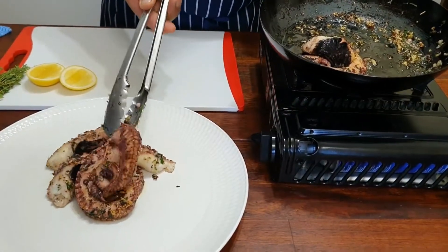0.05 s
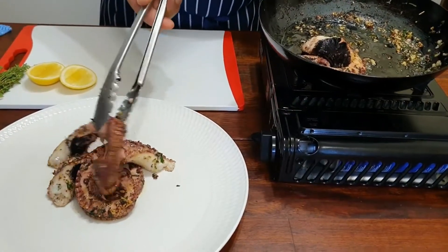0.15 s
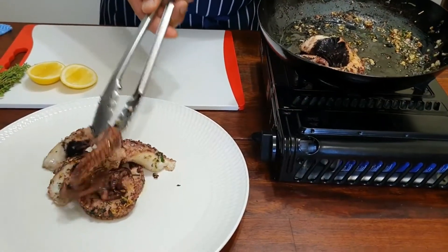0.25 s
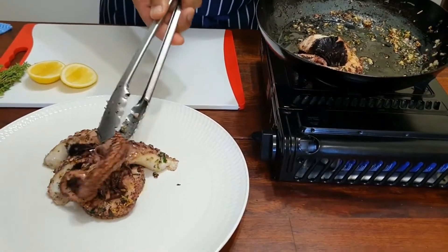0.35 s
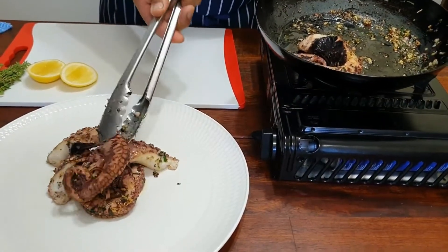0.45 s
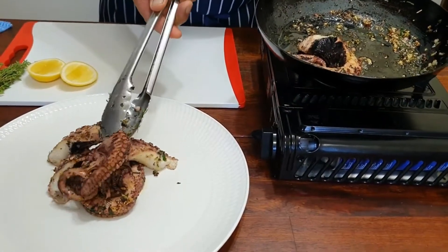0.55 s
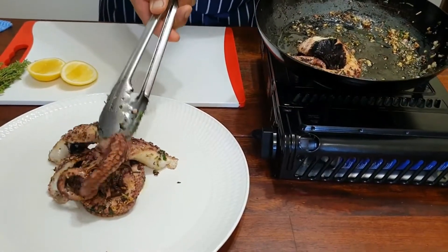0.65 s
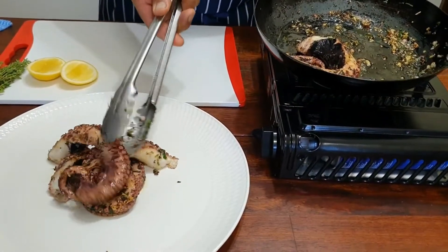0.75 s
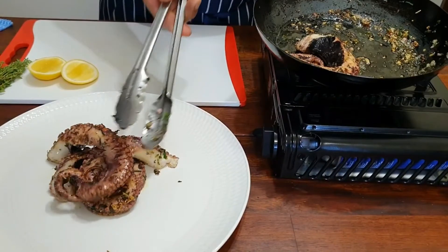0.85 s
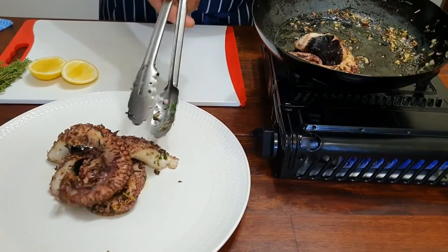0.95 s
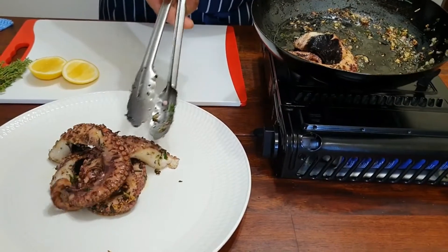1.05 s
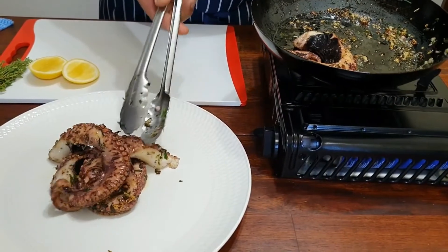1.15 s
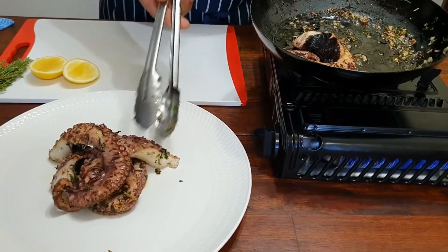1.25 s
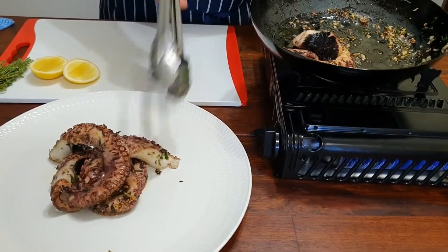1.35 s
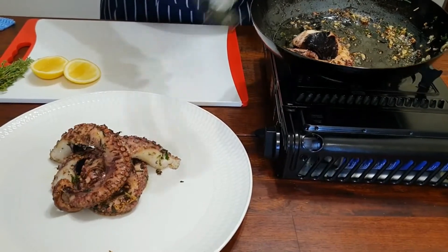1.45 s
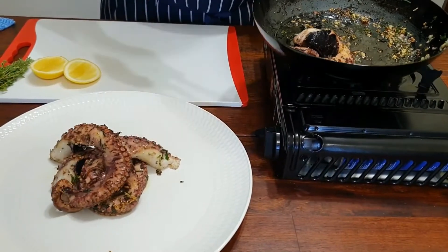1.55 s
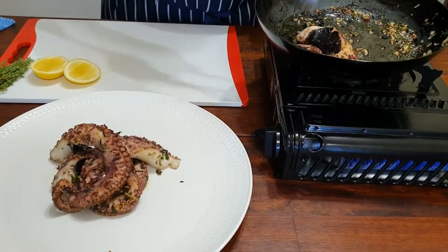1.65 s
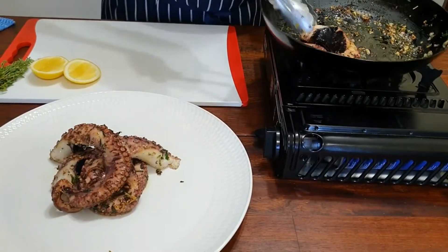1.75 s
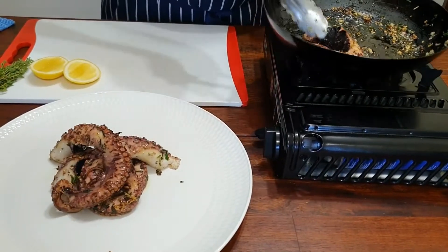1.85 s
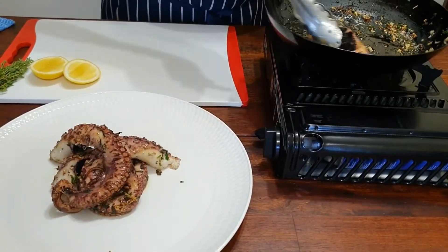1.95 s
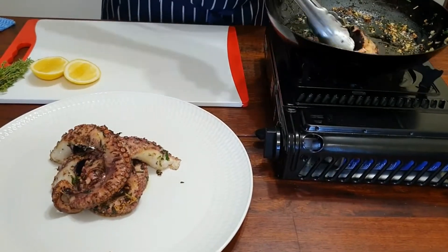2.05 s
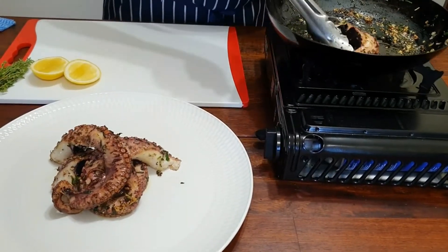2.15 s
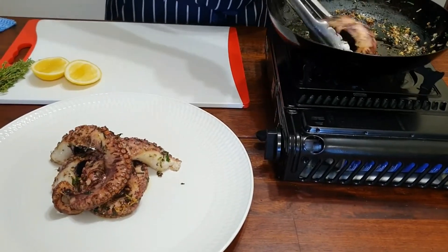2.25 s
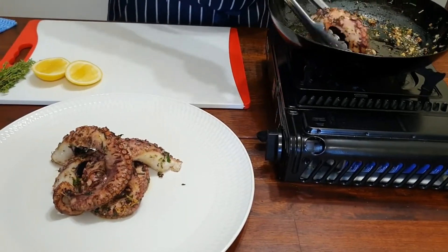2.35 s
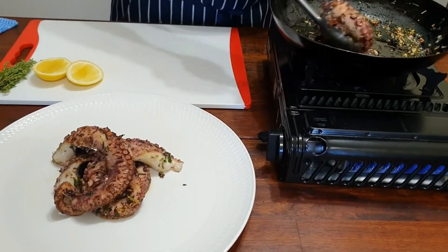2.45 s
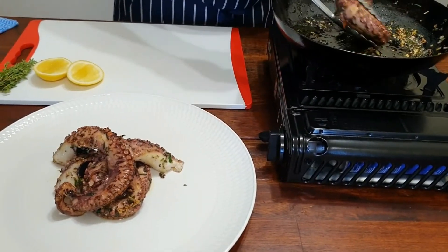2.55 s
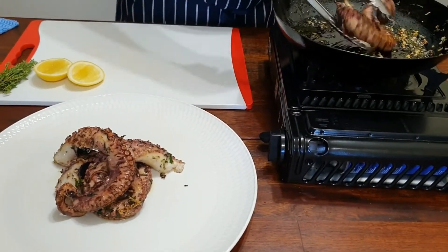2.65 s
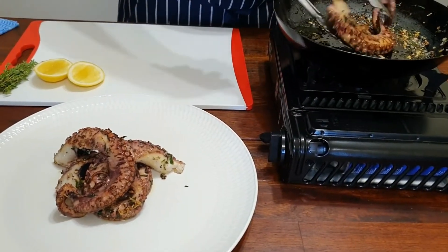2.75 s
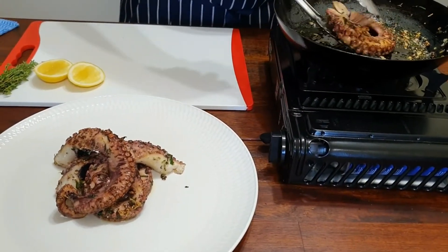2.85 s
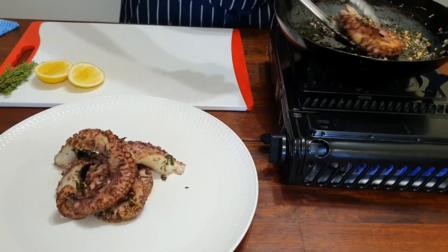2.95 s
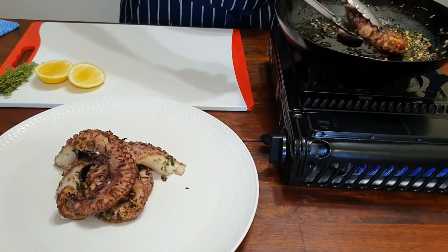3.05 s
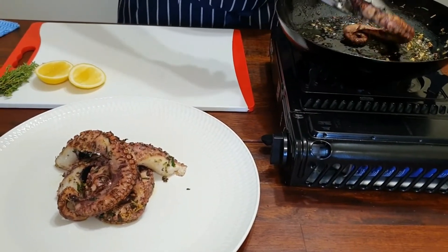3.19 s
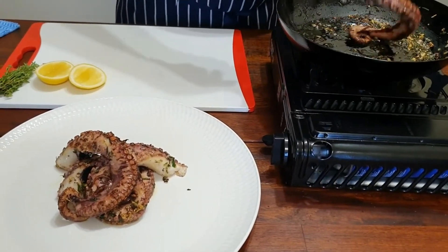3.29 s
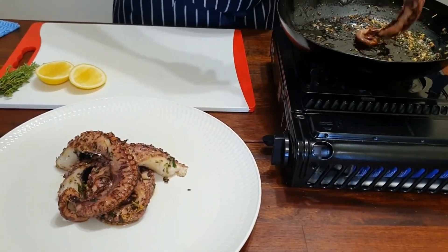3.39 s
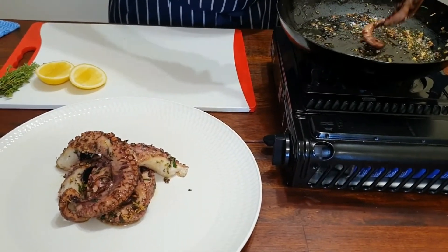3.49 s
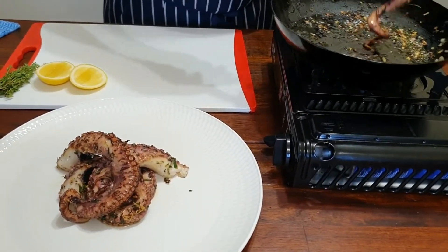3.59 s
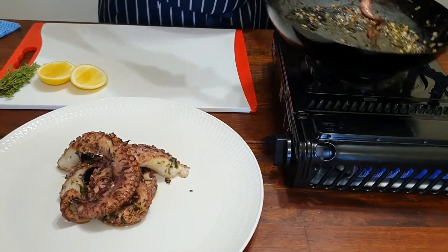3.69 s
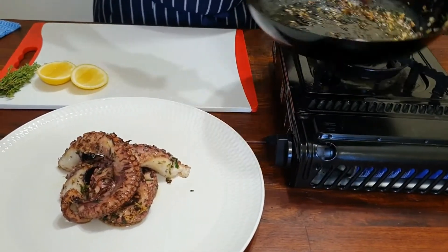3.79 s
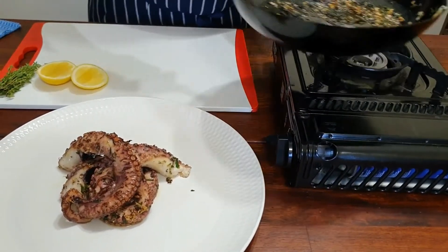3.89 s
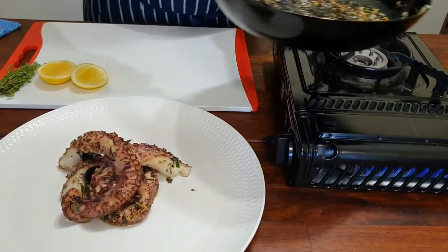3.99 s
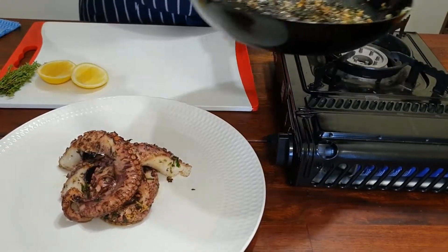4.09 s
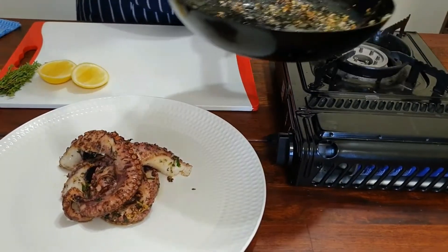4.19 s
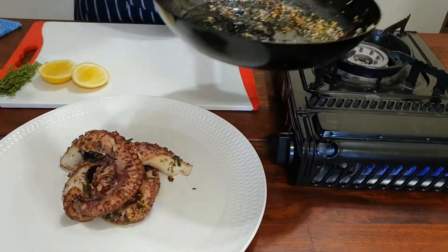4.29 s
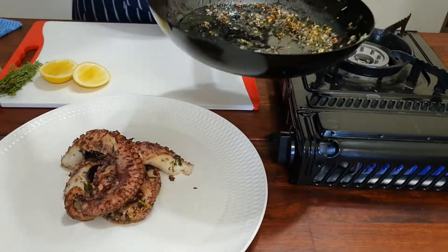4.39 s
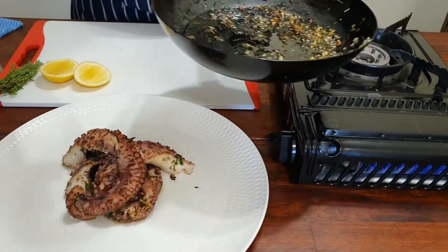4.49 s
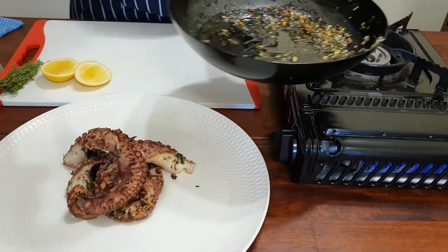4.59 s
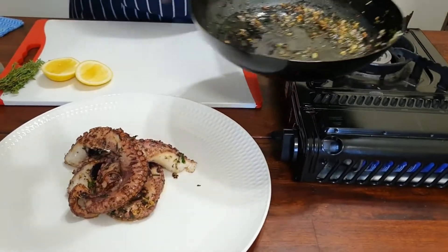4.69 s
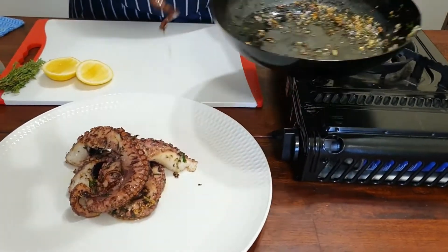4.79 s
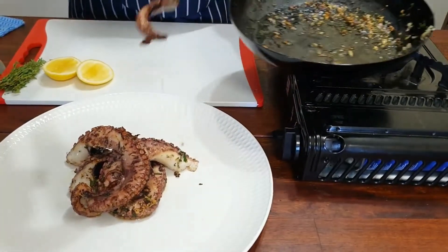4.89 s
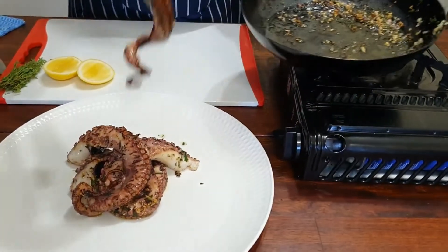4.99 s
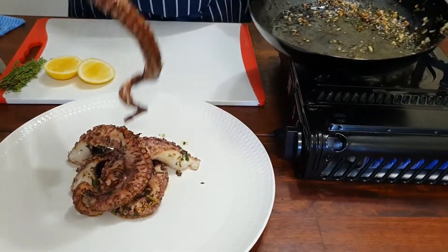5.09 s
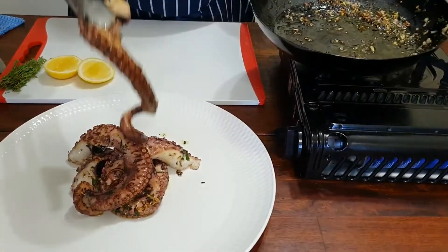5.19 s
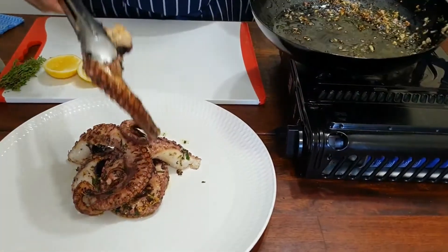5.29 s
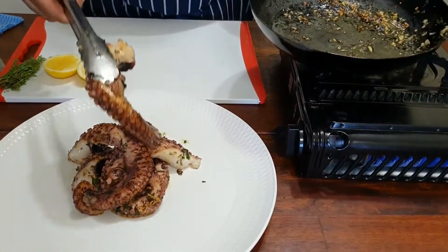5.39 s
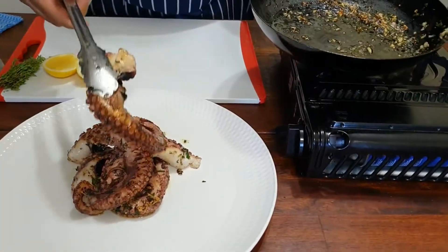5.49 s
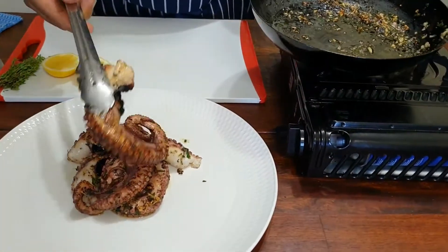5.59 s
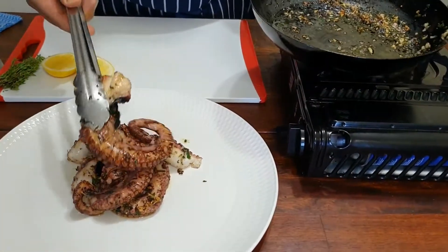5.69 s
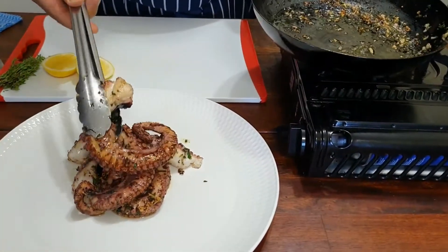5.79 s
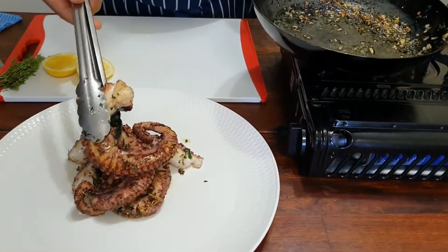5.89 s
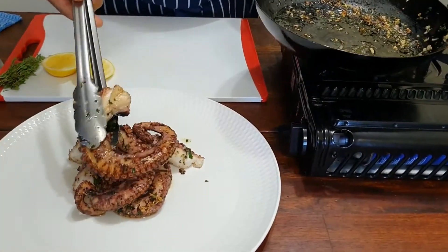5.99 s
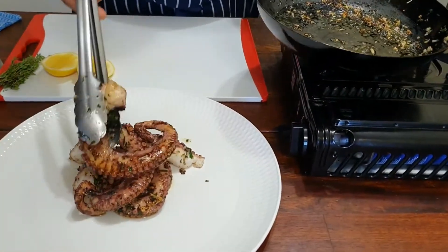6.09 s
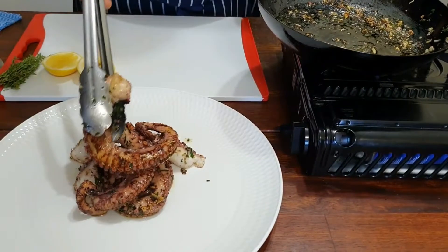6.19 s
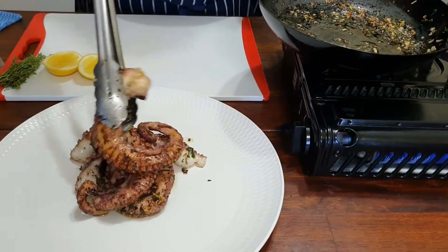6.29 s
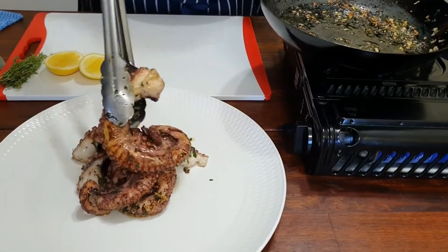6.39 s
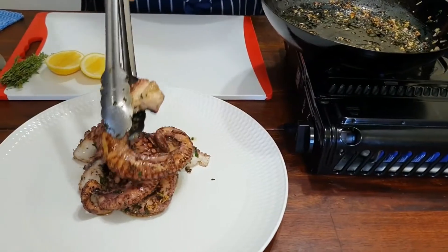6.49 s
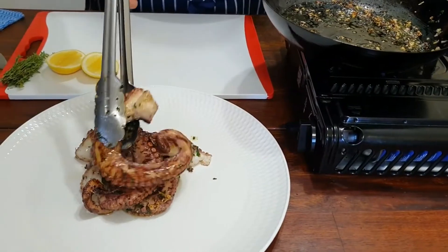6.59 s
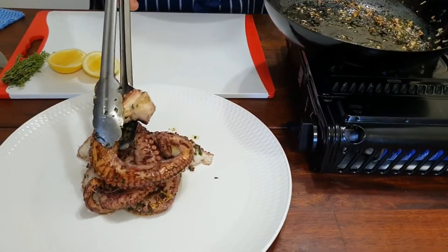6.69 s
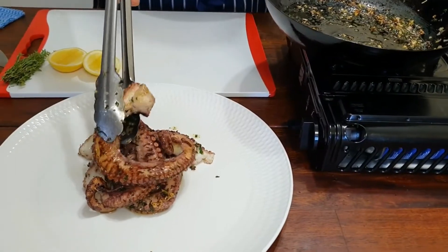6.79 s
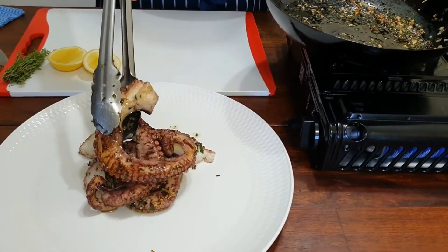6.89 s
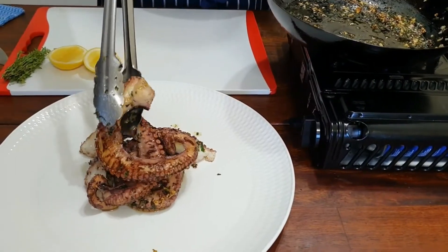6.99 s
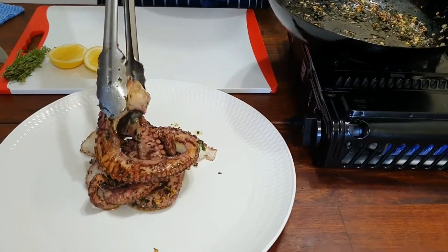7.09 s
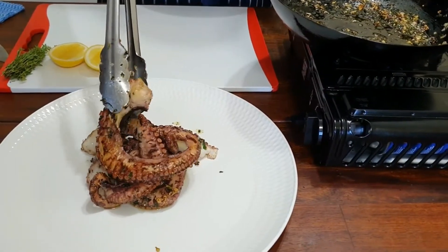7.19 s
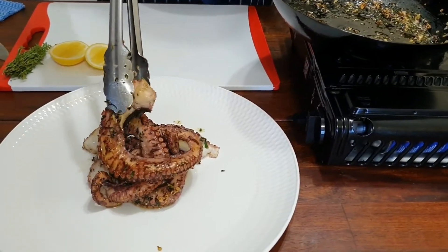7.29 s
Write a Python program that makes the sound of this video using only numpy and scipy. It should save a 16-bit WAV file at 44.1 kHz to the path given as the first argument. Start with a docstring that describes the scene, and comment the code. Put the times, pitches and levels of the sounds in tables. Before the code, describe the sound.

In a quiet kitchen, metal tongs bump a plate, clatter and scrape in a pan, and the pan later knocks onto its stove grate.

```python
"""Tongs at a frying pan

Steel tongs fetch grilled food from a pan and lay it on a plate in a small kitchen: dull plate bump, then
clacks and slides in the pan; the pan is lifted off a portable stove, set back and nudged on its grate.
Blows are noise through struck-spot resonances plus decaying modes and a low hum; strokes are random slips
under swelling pressure; wet squelches are clumps of tiny pops. Behind: air noise, wavering drone, rumble."""
import sys
import numpy as np
from scipy import signal
from scipy.fft import rfft, irfft
from scipy.io import wavfile
from scipy.ndimage import uniform_filter1d

SR = 44100
rng = np.random.default_rng(int(sys.argv[2]) if len(sys.argv) > 2 else 0)


def transcribe(signal):
    """Save signal, clipped to [-1, 1], as a 16-bit WAV file at the path in sys.argv[1]."""
    frames = np.atleast_2d(signal).T
    limited = np.clip(frames, -1, 1)
    pcm = np.round(limited * 32767).astype(np.int16)
    wavfile.write(sys.argv[1], SR, pcm)


N = 324039
TIME = np.arange(N) / SR

# Source levels are nominal, before room echoes and stereo balance.
# Room air spectrum, relative: f/Hz, density/dB per Hz
AIR = [(12, -73), (20, -8), (43, -17), (91, -1), (176, -17.5), (282, -13.5), (361, -18.5), (392, -15),
       (593, -21.5), (760, -16.5), (825, -19), (1360, -20), (9330, -40.5), (11600, -42), (14500, -47)]
AIR_DB = -60.5
# Appliance drone: f/Hz, level/dB
HUM = [(100.6, -67), (68, -74)]
# Low rumble swells: t of peak/s, half length/s, level/dB
RUMBLES = [(4.1, 0.46, -58), (6.697, 0.99, -62.5)]
RUMBLE_HZ = 77.5

# Small wet squelches and squeaks, and a tiny high click of the tongs' spring. Columns:
# t/s, length/s, level/dB, centre f/Hz, width/Hz
SQUELCHES = [(0.2377, 0.003, -59, 12100, 3000), (0.238, .005, -73, 6500, 4000),
             (0.247, 0.34, -89, 6050, 3000), (3.0545, 0.004, -46.5, 6730, 4430),
             (4.796, 0.21, -82, 12000, 4030), (6.061, 0.25, -82, 3890, 220), (6.561, 0.32, -77, 3310, 200),
             (6.598, .22, -84, 2860, 200), (6.54, 0.51, -81.5, 5840, 4000)]

# Blows. Soft tilts the sound down, long contact shuts out treble, heavy adds a thud. Columns:
# t/s, body/dB, hollow re body/dB, thud re body/dB, tilt/dB per octave, contact/s, struck spot (name),
# low hum/dB (the bowl's in pan blows, a short dull hum in the plate bump), hum t60/s,
# rattle t60/s, room echo offset/dB
PLATE_BLOWS = [(0.819, -54, -6, -4, -13.5, 0.00027, "plate", -43, 0.085, 0.035, 0)]
TONG_BLOWS = [(1.647, -35.5, -9, -13.5, -6.5, 0.00017, "wall", -48.5, 0.5, 0.046, 1),
              (1.9165, -36, -13, -9, .5, 0.000095, "tips", -30, 0.36, 0.12, 1.5),
              (1.9526, -25, -16.5, -15.5, -4, 0.00022, "base", -29, 0.24, 0.028, -4),
              (1.9556, -25.5, -10, -17, -4.5, 0.00024, "base", -43, 0.27, .015, -5.5),
              (1.9755, -35, -15, -12.5, -2.5, 0.00027, "base", -60, .2, .02, 1.5),
              (2.0175, -36.5, -8, -16, -5.5, 0.00022, "base", -62, .2, 0.013, -6),
              (2.055, -43, -8, -16, -4.5, 0.00033, "base", -60, .2, .012, -7),
              (2.178, -50.5, -12, -19, -1, 0.00029, "base", -57, 0.18, 0.017, -4),
              (2.313, -44.5, -19, -17, -2.5, 0.00011, "grip", -49, 0.53, .05, 1),
              (2.405, -75, -9, -9, 6, 0.00013, "grip", -49, 0.34, .035, 1),
              (2.7715, -48, -4, -9, -1.6, 0.00016, "side", -46.5, 0.37, 0.055, -1),
              (3.032, -54, -12, -29, -10, .00024, "food", -53.5, 0.27, 0.043, -6),
              (3.0555, -50, -6, -14, -8, .00006, "food", -47.5, 0.27, 0.18, -2)]
GRATE_BLOWS = [(3.627, -45, -8, -8, -9.5, 0.00013, "prong", -42.5, 0.56, 0.082, -2),
               (3.7585, -46.5, -10.5, -13.5, -2.5, 0.00047, "prong", -60, 0.49, 0.023, -7),
               (5.0993, -30.5, -8, -14.5, -3, 0.00016, "case", -31, 0.7, 0.044, -2.5),
               (5.224, -36.5, -6, -13, -5.5, .00012, "case", -34.5, 0.61, 0.097, 0),
               (5.225, -61, -16.5, -22, -3, 0.000055, "case", -60, 0.27, 0.014, -4),
               (6.2522, -45, -3, -1.5, -4.5, 0.00021, "corner", -33.5, .36, 0.042, -2),
               (6.3273, -52.5, -10, 1.5, -7.5, 0.00019, "corner", -59, 0.27, .04, -4),
               (6.372, -62.5, 1, 7, -9, 0.00036, "corner", -58, .3, 0.022, -4)]
# Blow registers thud, hollow, body, clank, edge, tick: low f/Hz, high f/Hz
BANDS = [(50, 360), (410, 700), (700, 1400), (1400, 3500), (3500, 8500), (8500, 16000)]
CLANK_DB = 6  # added to the clank register of every blow
# Struck spots on pan, stove or plate. name: (crowd of weak modes/dB, [f/Hz, half width/Hz, level/dB])
SPOTS = {"wall": (-10, [(545, 8.8, -10), (863, 127, 1.5), (1210, 81, 1.5), (1594, 58, -10), (1860, 20, -11),
         (2540, 54, -15.5), (2970, 74, -14)]), "tips": (-2.5, [(1464, 26, 1), (1800, 31, -4),
         (2120, 29, -16), (2450, 41, -14.5), (2960, 33, -9), (3334, 31, -12.5), (5530, 28, -13.5),
         (5800, 28, -15), (7060, 56, -15.5), (7520, 59, -12.5)]), "base": (-5.5, [(1015, 67, -2.5),
         (1275, 42, -10.5), (1590, 18.5, -21), (1680, 75, -7), (2090, 20, -18), (2300, 59, -10),
         (2530, 88, -8), (2820, 31, -10.5), (3270, 37, -8), (3640, 25, 1)]), "grip": (-12, [(1170, 100, -5),
         (1510, 50, -14), (2010, 140, -7), (2580, 89, -4), (2830, 29, -9), (3760, 47, -34)]),
         "side": (-9.5, [(528, 16, -7), (680, 36, -2), (1123, 28, -5.5), (1712, 63, 2), (1990, 39, -9),
         (2220, 25, -2), (2550, 36, -8), (3230, 120, -8.5), (4630, 32, -33), (5360, 34, -23)]),
         "food": (-8, [(650, 54, -3), (1180, 55, -2), (1800, 38, -1), (2700, 49, -21)]),
         "prong": (-10, [(670, 7.8, -13.5), (978, 32, -7.5), (1730, 120, 1.5), (2050, 79, -9),
         (2820, 29, -17), (3330, 26, -11.5)]), "case": (-9.5, [(535, 34, -14), (778, 36, 0),
         (856, 45, -0.5), (918, 32, 0.5), (1213, 60, -0.5), (1317, 56, -2), (1690, 92, -3.5),
         (1848, 74, -0.5), (2240, 120, -9.5), (2487, 110, -4), (2830, 61, -8.5), (3040, 110, -8.5),
         (3700, 180, -13.5), (4510, 60, -16.5), (5500, 150, -22.5)]), "corner": (-8.5, [(790, 11, 1.5),
         (955, 53, 2), (1420, 21, -8), (1700, 34, -6), (2060, 49, -11), (2280, 77, -13), (2500, 47, -13),
         (3660, 46, -15), (3830, 36, -10)]), "plate": (-5.5, [(662, 140, -0.5), (910, 49, 3),
         (1170, 110, -11)])}
# Spectrum of the crowd of weak modes, relative: f/Hz, level/dB
CLATTER = [(60, -14.5), (110, -15.5), (200, -20.5), (330, -16), (520, -7), (640, -16), (800, -4.5),
           (1000, -5), (1350, -1.5), (1750, -2.5), (2150, -5.5), (2520, -8.5), (4300, -17), (5600, -19.5),
           (8000, -20.5), (14000, -25.5)]
# Plate modes: f/Hz, level/dB, t60/s
PLATE = [(283, 9, .12), (680, 4, 0.1), (790, 5.5, 0.15), (937, 4.1, 0.17), (1256, 1, .1)]
# Pan modes other than the bowl hum: f/Hz, level/dB, t60/s
PAN = [(272, 5, .45), (302, 6, .45), (536, 1, .65), (776, 1, .42), (820, -1, .45), (935, 2, .4),
       (1011, 4, .5), (1137, -2, .4), (1178, -3, .45), (1223, 0, .5), (1268, -1, .45), (1314, 3, .55),
       (1402, -1, .55), (1478, -2, .45), (1530, 0, .45), (1612, -2, .45), (1695, -3, .5), (1772, 0, .45),
       (1822, -2, .45), (1890, 1, .4), (2080, 1, .45), (2286, 1, .45), (2456, 0, .45), (2492, 3, .5),
       (2574, 0, .45), (2831, 2, .45), (2907, -1, .4), (3083, 0, .4), (3425, 0, .4)]
# Low hum, with a gradual onset in blows: the pan bowl's, also used for the plate bump's dull hum
LOW_HUM_HZ, LOW_HUM_RISE_S = 387.9, 0.013
# Tong modes: f/Hz, level/dB, t60/s
TONGS = [(1478, 3, .13), (1826, 1, .14), (2100, -2, .12), (2449, -1, .13), (2570, -4, .14), (3321, -4, .18),
         (3801, -7, .12), (4316, -15, .4), (5536, 5, .16), (6196, -9, .12), (7187, -11, .15),
         (7413, -12, .22), (7843, -11, .12), (9496, -17, .2), (11910, -18, .12), (12850, -19, .12)]
# Singing tong arms: t/s, level/dB, tilt about ARM_HZ/dB per octave
ARM_RINGS = [(1.9175, -35, -1.5), (2.3135, -52, 0), (2.772, -66, -3), (3.0555, -70, 6)]
ARM_HZ = 5536

# Strokes in the pan: steel tongs sliding, food pushed faintly through the oil (t = 3.36 s), and a late
# swell of bowl hum after the blow at 2.313 s (t = 2.37 s); then the pan dragged on the grate. Columns:
# t of peak/s, half length/s, level/dB, squeal f/Hz, squeal re rasp/dB, grit re rasp/dB, bowl hum/dB
PAN_STROKES = [(1.87, 0.098, -59.5, 1026, -3, -24, -63), (2.035, 0.021, -44.5, 1330, 1, -13, -60),
               (2.09, 0.028, -44.5, 1060, 1.5, -22, -37.5), (2.16, .034, -50, 1082, 1.5, -12.5, -42),
               (2.235, 0.042, -59, 1123, 3, -14, -61), (2.29, 0.039, -58.5, 1160, 10, -14, -78),
               (2.33, 0.016, -52.5, 1206, 3, -5, -55), (2.37, 0.053, -78.5, 1160, 2, 8.5, -47.5),
               (2.735, 0.029, -65.5, 575, -2, -22, -55.5), (2.93, 0.076, -71.5, 680, -1, -29, -64.5),
               (3.027, .008, -63, 696, 0, -28, -70), (3.09, 0.049, -62, 1229, 2, -15, -57),
               (3.36, 0.28, -70, 1294, -8, -24, -80)]
PAN_DRAGS = [(3.725, 0.026, -58, 1100, 6.5, -43, -62), (3.75, .016, -50.5, 1783, -4.5, -48.5, -68),
             (6.52, 0.048, -64, 860, -0.5, -39.5, -53.5), (6.64, 0.037, -62, 776, -4, -35, -49),
             (6.745, 0.06, -64, 1780, -10, -37, -55.5), (6.91, 0.031, -68.5, 810, -1, -39, -51),
             (7.13, 0.097, -74, 815, 1, -40, -66)]
# Rasp spectrum, relative: f/Hz, level/dB
RUB = [(100, -40), (300, -2.5), (550, 9), (1100, 5), (1800, 4.5), (2800, -6), (4200, -9.5), (8000, -14.5),
       (15000, -102)]
SQUEAL_GLIDE_PER_HALF_LENGTH = 0.04  # fraction of squeal frequency
OVERTONE_RATIO, OVERTONE_DB = 2.2, -16

# Kitchen decay: f/Hz, t60/s
KITCHEN = [(100, 0.57), (400, 0.61), (1000, 0.39), (2500, 0.39), (6000, 0.61), (13000, 0.18)]
# Left/right likeness of diffuse sound: f/Hz, likeness (0 to 1)
LIKENESS = [(60, 0.93), (300, 0.88), (600, 0.46), (1100, 0.0011), (3000, 0), (15000, 0.088)]
EDGE_HZ = 14700


def amp(db):
    """Decibels to gain."""
    return 10 ** (np.asarray(db) / 20)


def evened(x):
    """Scales to rms 1."""
    return x / np.sqrt(np.mean(x ** 2) + 1e-20)


def read(points, hz):
    """Interpolates a table on a log-frequency axis."""
    f_hz, value = np.transpose(points)
    return np.interp(np.log(hz + 1), np.log(np.maximum(f_hz, 1)), value)


def bump(hz, centre_hz, width_hz):
    """Squared resonance magnitude; gain 1/2 at half the width either side of centre."""
    return 1 / (1 + (2 * (hz - centre_hz) / width_hz) ** 2)


def swell(age_s, half_s):
    """Gaussian rise and fall around age 0; 1/e at half_s."""
    return np.exp(-(age_s / half_s) ** 2)


def noise(gain, size):
    """Noise of rms 1 with the spectrum gain(hz)."""
    spectrum = rfft(rng.standard_normal(size)) * gain(np.fft.rfftfreq(size, 1 / SR))
    return evened(irfft(spectrum, size))


def impulses(size, per_s, floor):
    """Sparse random impulses over a weaker noise floor."""
    return rng.standard_normal(size) * (floor + (rng.random(size) < per_s / SR))


def pair(x):
    """Two unrelated signals become a diffuse field at two close points: alike in the bass."""
    size = x.shape[1]
    a, b = rfft(x)
    same = np.clip(read(LIKENESS, np.fft.rfftfreq(size, 1 / SR)), -1, 1)
    return irfft(np.array([a, same * a + np.sqrt(1 - same ** 2) * b]), size)


def ring(modes, t):
    """Exponentially dying sines with random phases."""
    return sum(amp(db - 60 * t / t60_s) * np.sin(2 * np.pi * (hz * t + rng.random()))
               for hz, db, t60_s in modes)


def add(mix, t_s, sound):
    """Mixes a stereo sound in at time t_s."""
    part = mix[:, max(round(t_s * SR), 0):][:, :sound.shape[1]]
    part += sound[:, :part.shape[1]]


def coloured(x, gain):
    """Causal minimum-phase filter with the given gain per bin: resonances ring only after the blow."""
    size = x.shape[1]
    half = size // 2 - 1
    fold = np.concatenate([[1], np.full(half, 2), [1], np.zeros(half)])
    cepstrum = irfft(np.log(gain + 1e-9), size)
    return irfft(rfft(x) * np.exp(rfft(cepstrum * fold)), size)


def kitchen(x, tail_db=1, early_db=-2, early_s=0.027, glances_per_s=1200):
    """Direct sound from the right, glances off worktop and walls, and a tail dying band by band."""
    size = 3 * SR // 5
    age_s = np.arange(size) / SR
    hz, t, bins = signal.stft(pair(rng.standard_normal((2, size))), SR, nperseg=256)
    bins = bins * amp(-60 * t / read(KITCHEN, hz)[:, None])
    tail = signal.istft(bins, SR, nperseg=256)[1][:, :size]
    tail *= 1 - np.exp(-age_s / 0.00062)
    glances = rng.standard_normal((2, size)) * (rng.random((2, size)) < glances_per_s / SR)
    early = pair(glances * (age_s > 0.001) * np.exp(-2 * age_s / early_s))
    echo = (amp(tail_db) * evened(tail) + amp(early_db) * evened(early)) / np.sqrt(size)
    echo[[0, 1], [8, 0]] += 1  # direct sound; left lags by 8 samples
    return signal.fftconvolve(x[None], echo, axes=1)


def background(waver=0.64):
    """Steady room air, a wavering drone and a low rumble that comes and goes."""
    air = pair(np.array([noise(lambda hz: amp(read(AIR, hz)), N) for _ in range(2)]))
    drone = np.zeros(N)
    for hz, db in HUM:
        tone = np.sqrt(2) * np.sin(2 * np.pi * (hz * TIME + rng.random()))
        drone += amp(db) * tone * (1 + waver * noise(lambda f: bump(f, 0, 1.0), N))
    rumble_level = sum(amp(db) * swell(TIME - t_s, half_s) for t_s, half_s, db in RUMBLES)
    rumble = noise(lambda hz: bump(hz, RUMBLE_HZ, 10.2), N) * rumble_level
    return air * amp(AIR_DB) + drone + rumble


def squelches(pops_per_s=900):
    """Clumps of tiny band-filtered pops: wet squelches and squeaks, and the tongs' spring click."""
    out = np.zeros((2, N))
    for t_s, length_s, db, centre_hz, width_hz in SQUELCHES:
        size = round(length_s * SR)
        pops = impulses(size, pops_per_s, 0.092)
        band = bump(np.fft.rfftfreq(size, 1 / SR), centre_hz, width_hz)
        fizz = evened(irfft(rfft(pops) * band, size)) * signal.windows.tukey(size, 0.3)
        add(out, t_s, amp(db) * kitchen(fizz, tail_db=1.0, early_db=1.5))
    return out


def registers(body_db, hollow_db, thud_db, tilt_db, contact_s, steepness=8, pivot_hz=760):
    """Register levels: tilted above the body, cut above one cycle per contact time."""
    hz = np.sqrt(np.prod(BANDS[3:], axis=1))
    contact_cut_db = 10 * np.log10(1 + abs(hz * contact_s) ** steepness)
    upper_db = tilt_db * np.log2(hz / pivot_hz) - contact_cut_db
    upper_db[0] += CLANK_DB
    return body_db + np.append([thud_db, hollow_db, 0], upper_db)


def struck(spot, hz):
    """Gain of the resonances a blow on this spot wakes, over the crowd of weaker ones."""
    crowd_db, peaks = SPOTS[spot]
    crowd = amp(crowd_db + read(CLATTER, hz))
    power = sum((amp(db) * bump(hz, f, 2 * half_hz)) ** 2 for f, half_hz, db in peaks)
    return np.sqrt(crowd ** 2 + power)


def blow(row, modes, ring_db, crack_db, crack_s, rattles_per_s=500):
    """Crack and rattle drive the struck spot; modes and a low hum join; contact weights the registers."""
    t_s, *contact, spot, hum_db, hum_t60_s, rattle_t60_s, room_db = row
    size = 4 * SR // 5
    t = np.arange(size) / SR
    hz = np.fft.rfftfreq(size, 1 / SR)

    rattle = evened(impulses(size, rattles_per_s, 0.15)) * amp(-60 * t / max(rattle_t60_s, 0.005))
    crack = amp(crack_db) * swell(t, crack_s) * rng.standard_normal(size)
    dry_force = (rattle + crack) * (1 - np.exp(-t / 0.00041))
    force = kitchen(dry_force, tail_db=room_db + 2.5, early_db=room_db + 3, glances_per_s=400)[:, :size]

    # Flatten the broad force spectrum, then impose the spot resonances.
    power = (abs(rfft(force)) ** 2).mean(0)
    uneven = np.sqrt(abs(uniform_filter1d(power, size=56)) + 1e-12)
    clatter = coloured(force, evened(struck(spot, hz)) / evened(uneven))
    driven = [(f, db + 20 * np.log10(struck(spot, f)), t60_s) for f, db, t60_s in modes]
    ringing = pair(np.array([ring(driven, t), ring(driven, t)])) * (1 - np.exp(-t / 0.00011))
    heard = clatter + amp(ring_db) * ringing

    # Set register levels from the first 1/30 s.
    weights = []
    for (low_hz, high_hz), db in zip(BANDS, registers(*contact)):
        band = signal.butter(4, (low_hz, high_hz), "bandpass", fs=SR, output="sos")
        part = signal.sosfilt(band, heard[:, :SR // 30])
        weights += [(f, db - 20 * np.log10(part.std())) for f in (low_hz * 1.1, high_hz / 1.1)]
    low_cut = hz ** 2 / (hz ** 2 + BANDS[0][0] ** 2)
    out = coloured(heard, amp(read(weights, hz)) * low_cut + 1e-6)
    hum = amp(hum_db - 60 * t / hum_t60_s) * np.sin(2 * np.pi * LOW_HUM_HZ * t)
    return t_s, out + hum * (1 - np.exp(-t / LOW_HUM_RISE_S))


def tongs():
    """Tongs bump the plate dully, then strike the pan; decaying tong modes make the arms sing."""
    out, t = np.zeros((2, N)), np.arange(SR // 2) / SR
    for row in PLATE_BLOWS:
        add(out, *blow(row, PLATE, ring_db=-10.5, crack_db=-7, crack_s=0.0021))
    for row in TONG_BLOWS:
        add(out, *blow(row, PAN, ring_db=-19.5, crack_db=0.0, crack_s=0.0022))
    for t_s, level_db, tilt_db in ARM_RINGS:
        modes = [(hz, level_db + db + tilt_db * np.log2(hz / ARM_HZ), t60_s) for hz, db, t60_s in TONGS]
        add(out, t_s, ring(modes, t) * (1 - np.exp(-t / 0.001)) * np.ones((2, 1)))
    return out


def scrapes(strokes, slips_per_s, ring_db=-5, chatter_width_hz=300):
    """Tiny slips under swelling pressure give a rasp, pan ring, gliding squeal, bright grit and bowl hum."""
    out, t = np.zeros((2, N)), np.arange(SR // 3) / SR
    for t_s, half_s, db, squeal_hz, squeal_db, grit_db, hum_db in strokes:
        age_s = np.arange(-2 * half_s, 2 * half_s, 1 / SR)
        size, pressure = len(age_s), swell(age_s, half_s)
        hz = np.fft.rfftfreq(size, 1 / SR)
        slips = impulses(size, slips_per_s, 0.092)
        rasp = evened(irfft(rfft(slips) * amp(read(RUB, hz)), size))
        grit = evened(irfft(rfft(slips) * bump(hz, 8100, 13000), size))
        rung = evened(signal.fftconvolve(slips, ring(PAN, t))[:size])

        glide_hz = squeal_hz * (1 + SQUEAL_GLIDE_PER_HALF_LENGTH * age_s / half_s)
        phase = 2 * np.pi * np.cumsum(glide_hz) / SR
        tone = np.sin(phase) + amp(OVERTONE_DB) * np.sin(OVERTONE_RATIO * phase)
        chatter = noise(lambda f: bump(f, 0, chatter_width_hz), size)
        squeal = evened(chatter * tone)

        rub = rasp + amp(ring_db) * rung + amp(squeal_db) * squeal + amp(grit_db) * grit
        hum = amp(hum_db) * pressure * np.sin(2 * np.pi * LOW_HUM_HZ * age_s)
        add(out, t_s + age_s[0], amp(db) * kitchen(pressure * rub))
        add(out, t_s + age_s[0], hum * np.ones((2, 1)))
    return out


def grate():
    """The pan knocks on the grate and shakes the stove's case, waking spot resonances and pan modes."""
    out = np.zeros((2, N))
    for row in GRATE_BLOWS:
        add(out, *blow(row, PAN, ring_db=-21, crack_db=2.0, crack_s=0.0023))
    return out


def scene():
    """Sums all layers, tongs and grate leaning slightly right; slips are denser in strokes than drags."""
    out = background() + squelches()
    out += tongs() * amp([[-0.6], [0.6]])
    out += scrapes(PAN_STROKES, slips_per_s=450)
    out += scrapes(PAN_DRAGS, slips_per_s=300)
    out += grate() * amp([[-0.9], [0.9]])
    return out


def record(dry):
    """Linear-phase low-pass at EDGE_HZ."""
    lowpass = signal.firwin(401, EDGE_HZ, window=("kaiser", 8), fs=SR)
    return signal.oaconvolve(dry, lowpass[None], "same")


dry = scene()
out = record(dry)
transcribe(out)
```